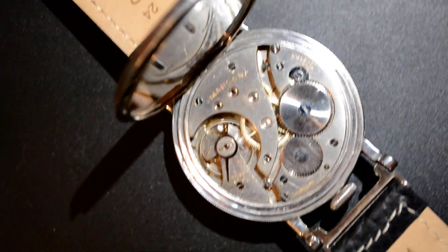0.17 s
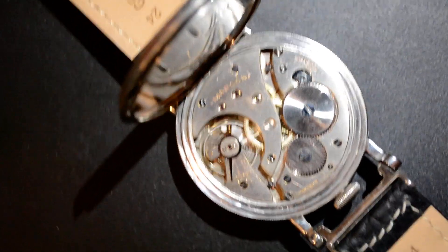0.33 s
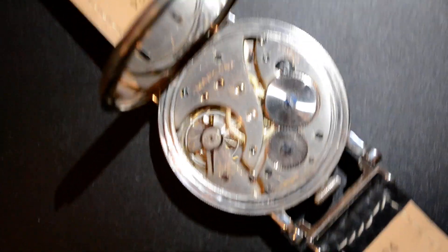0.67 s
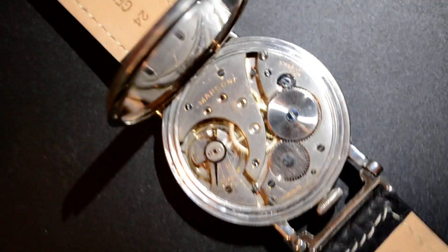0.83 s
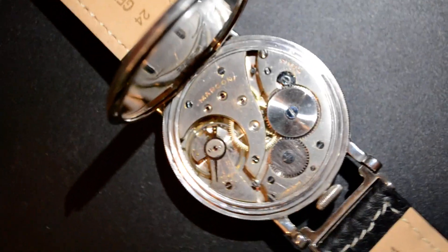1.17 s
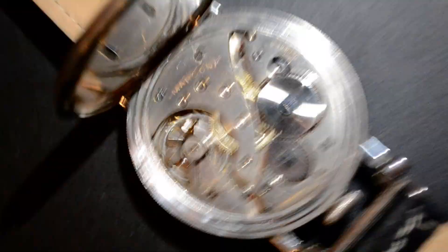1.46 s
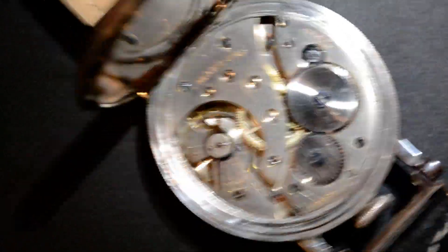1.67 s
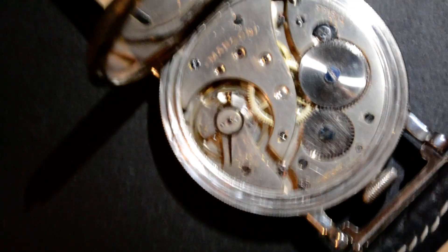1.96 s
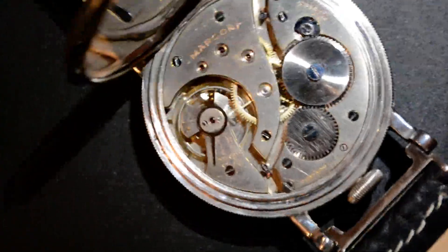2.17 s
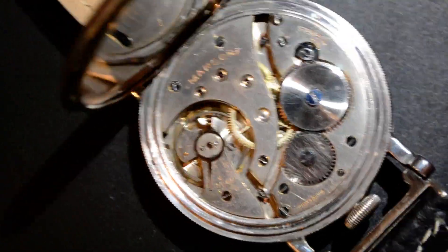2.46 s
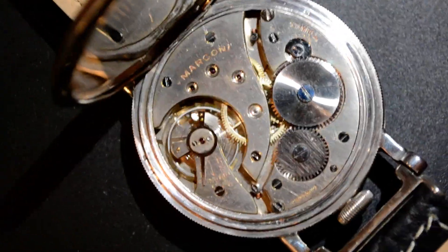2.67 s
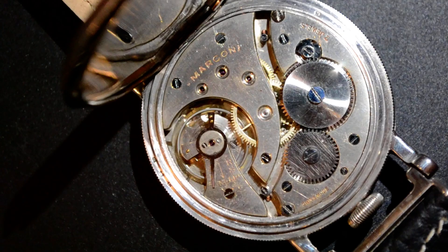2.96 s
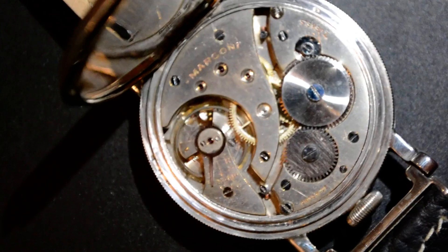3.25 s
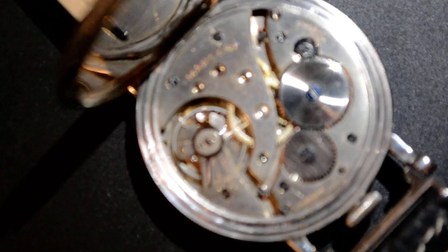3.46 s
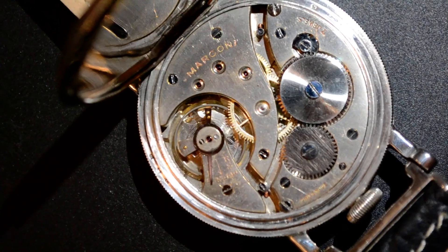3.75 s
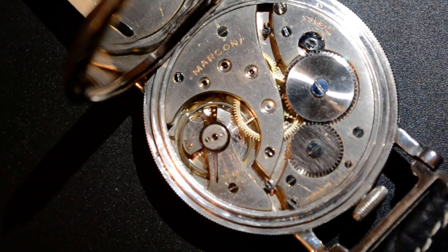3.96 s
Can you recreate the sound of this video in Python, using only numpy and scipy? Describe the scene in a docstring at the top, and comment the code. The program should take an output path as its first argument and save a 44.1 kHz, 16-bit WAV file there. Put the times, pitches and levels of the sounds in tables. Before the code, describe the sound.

Soft rapid watch ticking under camera handling clicks, a scraping lens barrel ending in a loud knock, then brief focus-motor whirs.

```python
"""A quiet room, with a camera held close: an old watch ticks faintly under it, five beats a second.
The hand clicks on the camera body, and the zoom barrel slides and knocks against its stop.
After a light button press the focus motor hunts in four short runs.
Blows are decaying modes plus noise cracks; sliding and rubbing are noise coloured by resonances.
Handling reaches the microphone through the housing, so it is nearly dry, over hiss and hum."""
import sys
import numpy as np
from scipy import signal
from scipy.fft import rfft, irfft
from scipy.io import wavfile
from scipy.ndimage import uniform_filter1d

SR = 44100
rng = np.random.default_rng(int(sys.argv[2]) if len(sys.argv) > 2 else 0)


def to_wav(sig):
    """Store sig (one row per channel, or 1-D mono) as 16-bit WAV at the path in sys.argv[1].

    Samples outside -1..1 are clipped; the rate is SR.
    """
    pcm = np.clip(np.atleast_2d(sig), -1, 1) * 32767
    pcm = np.round(pcm).astype(np.int16)
    wavfile.write(sys.argv[1], SR, pcm.T)  # frames by channels


N = 180829
TIME = np.arange(N) / SR
BLOW = TIME[:SR // 5]   # time axis of one blow, 0.2 s long

# Background hiss: (frequency [Hz], relative level [dB per Hz])
AIR_COLOUR = [(15, -59), (25, -15), (92, -10.5), (122, -10.5), (184, 2), (226, -5), (341, -1.5),
              (441, -4.5), (1260, -6), (2390, -12), (2940, -10.5), (7200, -25.5), (7980, -32.5),
              (9070, -32.5), (11400, -37), (14800, -69), (22000, -120)]
# Wavering hum: (frequency [Hz], level [dB])
HUM_TONES = [(100, -87), (173, -84.5), (199.5, -85), (345, -82.5)]
# Faint singing of the idling lens: (time [s], frequency [Hz], level [dB])
IDLE_SONG = [(0, 2715, -77), (1.304, 2703, -78), (1.599, 2920, -73.5), (2.3, 2987, -75), (2.7, 2973, -82.5),
             (4.1, 2910, -76)]
# Steady higher bands of the idling lens: (frequency [Hz], width [Hz], level [dB])
IDLE_BANDS = [(3140, 114, -83.5), (3624, 150, -85.5), (4360, 150, -84), (5170, 130, -95), (8960, 1600, -92)]

# Steel of the watch movement and case: (frequency [Hz], relative level [dB], t60 [s])
WATCH_MODES = [(2690, -31, .08), (3410, -35, .06), (3940, -11, .05), (4930, -20, 0.072), (6000, -6, 0.017),
               (6360, -1.5, 0.013), (6960, -8.5, 0.07), (7260, -7, 0.019), (7670, -13, 0.047),
               (8390, -27, 0.0063), (8750, -6, 0.018), (9900, -27, 0.038), (9800, -10.5, 0.02),
               (10650, -15, 0.021)]
# The escapement beats evenly, except that every tock comes a little early.
FIRST_BEAT_S, BEAT_S, TOCK_EARLY_S = .0429, .2, .0055
BEAT_DB, MODE_SCATTER_DB = -67, 2.5

# Knocks on the camera body, levels before the register gains:
# (time [s], contact length [s], level [dB], thud weight [dB], brightness [dB per register])
BODY_KNOCKS = [(0.7313, 0.00039, -65.5, -25, 6.5), (0.807, 0.0038, -63, 7.5, -5),
               (0.867, 0.012, -58.5, -7, -5.5), (0.888, 0.0044, -52, -20, -3.5),
               (0.901, 0.0034, -56.5, -4.5, -0.5), (0.9086, 0.0037, -47, -12.5, -2.5),
               (1.2087, 0.00071, -37.5, -24, -1.9), (1.305, 0.0046, -70.5, 11.5, -14),
               (1.333, 0.0042, -49, -4, -4), (1.3403, 0.0014, -43, -1.5, -7.5),
               (1.3452, 0.0031, -56.5, 7, 2.5), (1.504, 0.0024, -45.5, 3, -9),
               (1.5435, 0.0043, -22.5, -3, -1.0), (1.687, 0.0039, -55, -9, -8),
               (1.869, .0007, -63.5, -7, 0), (1.8752, 0.0024, -55, 4, 3), (2.044, 0.0052, -63, 0, -2.5)]
# Camera body: (frequency [Hz], relative level [dB], t60 [s])
BODY_MODES = [(262, -6, .03), (335, -2, .035), (410, -2.5, .031), (462, 0, .035), (750, 0, .035),
              (975, -4, .035), (1140, -7, .035), (1262, -3, .055), (1502, -4, .04), (1724, -7, .035),
              (1873, -1, .035), (2200, -6, .03), (2385, -8, .035), (2552, -8, .035), (2828, 3.5, .028),
              (3112, -8, .035), (3526, -8, .025), (4183, -11, .02), (4425, -8, .025), (4720, -9, .025),
              (4960, -6, .025), (5380, -8, .02), (6051, -19, .015), (6433, -17, .015), (7381, -19, .015),
              (8603, -24, .012), (9631, -18, .015)]
# Colour of the body's crack: (frequency [Hz], relative level [dB per Hz])
BODY_CRACK_COLOUR = [(50, -22), (150, -19), (330, -11), (470, 6.5), (600, -3.5), (780, 6.5), (1250, 10.5),
                     (1900, -2), (2300, -4.5), (2830, -7), (3700, -9.5), (5100, -8.5), (6700, -13),
                     (8200, -23.5), (9600, -13.5), (11400, -29.5)]
# Spans in which the fingers shift on the housing: (start [s], end [s])
FIDGET_SPANS = [(0.70, 1), (1.60, 2.12)]
FIDGET_DB, FIDGET_SPREAD_DB = -71, 4   # before the register gains
# One finger tick: (contact length [s], thud weight [dB], brightness [dB per register])
FINGER_TICK = (0.0023, -5, 1.3)
# A blow eases by this much just after the parts let go.
LET_GO_DB, LET_GO_S = -1.5, 0.0024

# Hiss of the sliding zoom barrel: (frequency [Hz], relative level [dB per Hz])
BARREL_COLOUR = [(71, -70), (120, -19), (172, -22.5), (190, -38), (272, -10), (377, -11.5), (922, -7.5),
                 (1160, -5), (1980, -7), (2790, -7.5), (3570, -11.5), (5130, -12.5), (7950, -17.5),
                 (9260, -17), (11400, -36), (14800, -73), (22000, -120)]
# Resonances of the zoom barrel: (frequency [Hz], width [Hz], relative level [dB])
BARREL_RINGS = [(1313, 260, -10.5), (2160, 130, -9), (2780, 450, -2), (4280, 240, -10.5), (5070, 600, -8)]
# The barrel slides steadily up to its stop, then rubs faintly as it settles.
SLIDE_START_S, SLIDE_STOP_S = 1.344, 1.546
SLIDE_DB, SLIDE_ATTACK_S = -46.5, 0.012
SETTLE_DB, SETTLE_DB_PER_S, SETTLE_UNEVEN_DB = -60.5, 76, 4.5

# Button press: (time [s], level of its ring [dB])
BUTTON_PRESSES = [(2.923, -41.5)]
# Ring of the button: (frequency [Hz], relative level [dB], t60 [s])
BUTTON_MODES = [(1115, 8, 0.0066), (1340, 5, 0.028), (1416, -9.5, 0.14), (2100, 3, 0.016),
                (2230, -2.5, 0.021), (3150, -6, 0.011), (4400, -10, 0.022), (4970, -11, 0.02),
                (7100, -19, 0.0067), (10400, -31, 0.0044)]

# Focus runs; the rubbing level is the base for a surge and a pitch-dependent loss,
# and the click levels come before the register gains:
# (start [s], turn to second speed [s], stop [s], first speed aimed at [Hz], second speed aimed at [Hz],
#  rubbing level [dB], starting click level [dB], braking click level [dB])
MOTOR_RUNS = [(3.056, 3.108, 3.1783, 1650, 299.7, -51, -82, -61.5),
              (3.2153, 3.318, 3.4556, 1902, 1260, -49.5, -59, -57.5),
              (3.5176, 3.599, 3.6874, 1525, 301, -50.5, -60, -58),
              (3.7568, 3.84, 3.8443, 1052, 1050, -52, -63.5, -59)]
# Time constants with which the motor spins up, and with which it nears its second speed
SPIN_UP_S, TURN_S = .035, .018
# Rubbing strands of the motor: (multiple of the speed [-], width [Hz], relative level [dB])
MOTOR_STRANDS = [(1, 70, 0.5), (2, 190, -0.5), (3, 190, 2), (4, 220, -14)]
# Hiss of the motor: (frequency [Hz], relative level [dB per Hz])
MOTOR_HISS = [(200, -21), (800, -6), (1300, -3), (2500, -5), (4400, 3.5), (5500, -9.5), (6300, -24),
              (7500, -16.5), (10100, -21.5), (11400, -43)]
# Resonances of the lens tube: (frequency [Hz], width [Hz], added level [dB])
LENS_TUBE = [(1300, 75, 6.5), (2510, 360, 1), (2910, 120, 5.5), (3780, 260, 3), (4440, 100, 5.5),
             (5030, 150, 4), (5840, 330, -2), (6700, 300, 11), (8450, 1100, 3), (9900, 590, 3)]
CLEAR_HZ = 1190   # above this speed the strands stand out of the rasp
# The rasp sinks from REST_HZ with the square of the speed, by SINK_HZ at CRUISE_HZ.
REST_HZ, SINK_HZ, CRUISE_HZ = 5130, 822, 1227
# Each run surges at first, and is loudest when the rasp suits the lens tube.
SURGE_DB, SURGE_S = 4.5, 0.025
LOUDEST_HZ, OFF_PITCH_DB_PER_OCTAVE = 4170, 13
# Clicks at the ends of a run: (contact length [s], thud weight [dB], brightness [dB per register])
STARTING_CLICK = (0.00041, -26, 7.2)
BRAKING_CLICK = (0.002, -10.5, 6.66)
# The drive takes up its slack during each run, levels before the register gains:
# (time [s], contact length [s], level [dB], thud weight [dB], brightness [dB per register])
SLACK_CLICKS = [(3.0615, .005, -58.5, -26, 9), (3.2295, .003, -52, -14, 5.5), (3.558, .002, -53.5, -3, -3),
                (3.5665, 0.0022, -45.5, -13.5, -1.5), (3.765, 0.0086, -55, -13, 6),
                (3.7702, 0.0042, -51.5, -20, 6.5)]
# Focus drive: (frequency [Hz], relative level [dB], t60 [s])
DRIVE_MODES = [(1016, -8.5, 0.045), (1334, -10, 0.065), (2190, -25, .03), (2650, 7.5, 0.018),
               (2880, -3, 0.036), (3960, 7.5, 0.015), (4500, 5.5, 0.029), (4920, 0, 0.038),
               (6852, -6, 0.018), (8720, -5.5, 0.014)]
# Colour of the drive's crack: (frequency [Hz], relative level [dB per Hz])
DRIVE_CRACK_COLOUR = [(88, -62), (150, -37), (713, -13.5), (1320, -8.5), (2000, -5.5), (2630, -21),
                      (3270, -11.5), (4450, -12.5), (8860, -26), (11400, -37), (14800, -68), (22000, -120)]


def from_db(db):
    """Decibels to gain."""
    return 10 ** (np.asarray(db) / 20)


def rms_one(x):
    """Scale to rms 1."""
    return x / np.sqrt(np.mean(x ** 2) + 1e-20)


def peak_one(x):
    """Scale a blow so that its loudest 5 ms have rms 1."""
    return x / np.sqrt(uniform_filter1d(x ** 2, size=220).max() + 1e-20)


def add(out, s, sound):
    """Mix a sound in at a time in seconds."""
    at = max(round(s * SR), 0)
    out[at:at + len(sound)] += sound[:N - at]


def band(x, low_hz, high_hz):
    """Causal band-pass."""
    edges = [low_hz, min(high_hz, .45 * SR)]
    return signal.sosfilt(signal.butter(2, edges, "band", fs=SR, output="sos"), x)


def noise(spectrum, size=N):
    """Noise of a given colour, rms 1."""
    hz, db = np.transpose(spectrum)
    bins = np.maximum(np.fft.rfftfreq(size, 1 / SR), 1)
    colour = from_db(np.interp(np.log(bins), np.log(hz), db))
    return rms_one(irfft(rfft(rng.standard_normal(size)) * colour, size))


def drift(rate):
    """Slow random wandering, rms 1: white noise through two equal low-pass poles."""
    r = np.exp(-2 * np.pi * rate / SR)
    wander = signal.lfilter([1], [1, -2 * r, r * r], rng.standard_normal(N + SR))
    return rms_one(wander[SR:])   # leave out the filter's first second


def rough_tone(hz, width):
    """A narrow band of noise round a steady or moving pitch, rms about 1."""
    phase = 2 * np.pi * np.cumsum(hz * np.ones(N)) / SR
    return drift(width * .5) * np.cos(phase) + drift(width * .5) * np.sin(phase)


def rough_tones(rows):
    """Sum of noise bands from (frequency [Hz], width [Hz], level [dB])."""
    return sum(from_db(db) * rough_tone(hz, width) for hz, width, db in rows)


def dying(t60, hold_s=0):
    """A blow holds while the parts touch, then dies away."""
    return from_db(-60 * np.maximum(BLOW - hold_s, 0) / t60)


def ring(modes, vary_db, hold_s=0):
    """One blow: every mode rings with a random strength and phase of its own."""
    out = np.zeros(len(BLOW))
    for hz, db, t60 in modes:
        strength = from_db(db + rng.normal(0, vary_db))
        out += strength * dying(t60, hold_s) * np.sin(2 * np.pi * (hz * BLOW + rng.random()))
    return out


def resonate(x, rings):
    """Add the resonances of a housing to a sound."""
    out = x.copy()
    for hz, width, db in rings:
        out += from_db(db) * signal.lfilter(*signal.iirpeak(hz, hz / width, fs=SR), x)
    return out


def background():
    """Hiss, a wavering hum and the faint singing of the idling lens, as steady or gliding noise bands."""
    hiss = from_db(-66.5) * noise(AIR_COLOUR)
    hum = sum(from_db(db) * rough_tone(hz, 4.7) for hz, db in HUM_TONES)
    s, hz, db = np.transpose(IDLE_SONG)
    song = from_db(np.interp(TIME, s, db)) * rough_tone(np.interp(TIME, s, hz), 90)
    return hiss + hum + song + rough_tones(IDLE_BANDS)


def room(x, t60):
    """A short diffuse tail from the table and walls: decaying noise, cut at 0.2 s."""
    tail = band(rng.standard_normal(len(BLOW)), 280, 4856)
    tail = tail * dying(t60) * (1 - np.exp(-BLOW / 0.003))
    return signal.fftconvolve(x, tail / np.sqrt(np.sum(tail ** 2)))[:N]


def watch(uneven_db, drop_s, drop_db):
    """Each beat: the pallet strikes, and a moment later the escape wheel drops onto its lock."""
    out = np.zeros(N)
    for k, due in enumerate(np.arange(FIRST_BEAT_S, N / SR - drop_s, BEAT_S)):
        s = due - TOCK_EARLY_S * (k % 2)
        db = BEAT_DB + rng.normal(0, uneven_db)
        strike = peak_one(ring(WATCH_MODES, MODE_SCATTER_DB))
        drop = peak_one(ring(WATCH_MODES, MODE_SCATTER_DB))
        add(out, s, from_db(db) * strike)
        add(out, s + drop_s, from_db(db + drop_db) * drop)
    return out


def fidgets(count):
    """Rows of faint touches at random moments in each span while the grip shifts."""
    length, weight_db, bright_db = FINGER_TICK
    rows = []
    for start, end in FIDGET_SPANS:
        for _ in range(count):
            db = FIDGET_DB + rng.normal(0, FIDGET_SPREAD_DB)
            rows.append((rng.uniform(start, end), length, db, weight_db, bright_db))
    return rows


def blows(table, modes, crack, crack_db, register_db, register_t60, rise_share):
    """Plastic parts meet: modes plus a dense crack, in four registers: thud, clack, ping and snap.
    A longer contact is a softer one; the snap rises and lets go first, the lows outlast it."""
    out = np.zeros(N)
    edges = [(110, 540), (620, 2200), (2400, 3400), (3600, 11500)]   # Hz
    contact_shares = [0.81, 0.56, 1.0, 0.17]
    registers = list(zip(edges, register_db, register_t60, contact_shares))
    for s, length, db, weight_db, bright_db in table:
        levels = [db + weight_db, db, db + bright_db, db + 2 * bright_db]
        grit = noise(crack, size=len(BLOW))
        for level, ((low, high), gain_db, t60, share) in zip(levels, registers):
            hold_s = length * share
            attack = 1 - np.exp(-BLOW / max(rise_share * hold_s, 1 / SR))
            let_go = from_db(LET_GO_DB * np.clip((BLOW - hold_s) / LET_GO_S, 0, 1))
            contact = attack * let_go
            near_modes = [mode for mode in modes if low / 2 < mode[0] < high * 2]
            tone = band(ring(near_modes, 0.89, hold_s) * contact, low, high)
            burst = band(grit * contact * dying(t60, hold_s), low, high)
            mixed = peak_one(tone) + from_db(crack_db) * peak_one(burst)
            add(out, s, from_db(level + gain_db) * peak_one(mixed))
    return out


def body_knocks():
    """The hand and the barrel's stop strike the camera body, which rings briefly and cracks."""
    return blows(BODY_KNOCKS + fidgets(count=5), BODY_MODES, BODY_CRACK_COLOUR, crack_db=4.0,
                 register_db=[1.5, 2.5, 2.35, 1.0],
                 register_t60=[0.022, 0.011, 0.011, 0.016], rise_share=0.21)


def zoom_barrel(grain_db):
    """Sliding friction hisses through the resonances of the barrel."""
    rub = rms_one(noise(BARREL_COLOUR) + rough_tones(BARREL_RINGS))
    since_start = np.maximum(TIME - SLIDE_START_S, 0)
    since_stop = np.maximum(TIME - SLIDE_STOP_S, 0)
    sliding = from_db(SLIDE_DB) * (1 - np.exp(-since_start / SLIDE_ATTACK_S))
    settling = from_db(SETTLE_DB - SETTLE_DB_PER_S * since_stop + SETTLE_UNEVEN_DB * drift(45))
    return rub * np.where(TIME < SLIDE_STOP_S, sliding, settling) * from_db(grain_db * drift(164))


def button(crack_db, crack_t60):
    """A light press: a short noise crack and a ring with one lingering mode."""
    out = np.zeros(N)
    for s, db in BUTTON_PRESSES:
        crack = peak_one(band(rng.standard_normal(len(BLOW)) * dying(crack_t60), 1200, 3400))
        tone = peak_one(ring(BUTTON_MODES, vary_db=1.0) * (1 - np.exp(-BLOW / 0.00029)))
        add(out, s, from_db(db) * (tone + from_db(crack_db) * crack))
    return out


def focus_motion():
    """Speed, rasp pitch and gain: each run spins up; the first three then ease to a slower speed,
    the last stops while still speeding up."""
    speed, drive = np.zeros(N), np.zeros(N)
    for start, turn, stop, first_hz, second_hz, db, *_ in MOTOR_RUNS:
        running = (TIME > start) & (TIME < stop)
        t = TIME[running]
        rising = first_hz * (1 - np.exp((start - np.minimum(t, turn)) / SPIN_UP_S))
        remaining = np.exp(-np.maximum(t - turn, 0) / TURN_S)
        speed[running] = second_hz + (rising - second_hz) * remaining
        drive[running] = from_db(db + SURGE_DB * np.exp((start - t) / SURGE_S))
    pitch = REST_HZ - SINK_HZ * (speed / CRUISE_HZ) ** 2
    off_pitch = np.abs(np.log2(pitch / LOUDEST_HZ))   # octaves
    gain = drive * from_db(-OFF_PITCH_DB_PER_OCTAVE * off_pitch)
    return speed, pitch, uniform_filter1d(gain, size=130)


def focus_motor(hiss_db, smear_db_per_octave, grain_db):
    """A friction motor: strands follow its speed through the lens tube, and smear into a rasp when slow."""
    speed, pitch, gain = focus_motion()
    strands = sum(from_db(db) * rough_tone(k * speed, width) for k, width, db in MOTOR_STRANDS)
    strands = band(rms_one(strands), 2520, 4200)
    smear = from_db(smear_db_per_octave * np.log2(CLEAR_HZ / (speed + 1)))
    whine = (strands + smear * rough_tone(pitch, 980)) / np.sqrt(1 + smear ** 2)
    rub = resonate(whine + from_db(hiss_db) * noise(MOTOR_HISS), LENS_TUBE)
    rub = rub / np.sqrt(uniform_filter1d(rub ** 2, size=500))   # even out, so that the gain sets loudness
    return rub * gain * from_db(grain_db * drift(200))


def drive_contacts():
    """Rows of clicks as each run starts, as the drive takes up its slack and as it brakes."""
    rows = list(SLACK_CLICKS)
    for start, _, stop, *_, start_db, brake_db in MOTOR_RUNS:
        for s, db, click in [(start, start_db, STARTING_CLICK), (stop, brake_db, BRAKING_CLICK)]:
            length, weight_db, bright_db = click
            rows.append((s, length, db, weight_db, bright_db))
    return rows


def drive_clicks():
    """Parts of the focus drive meet, ringing its modes with a dense crack."""
    return blows(drive_contacts(), DRIVE_MODES, DRIVE_CRACK_COLOUR, crack_db=-0.5,
                 register_db=[9.0, 5.0, -1.0, 0.0],
                 register_t60=[0.052, 0.028, 0.028, 0.0086], rise_share=0.16)


def scene():
    """Watch, camera and room at one microphone."""
    near = watch(uneven_db=0.7, drop_s=.005, drop_db=-13.0)
    near += body_knocks()
    near += zoom_barrel(grain_db=.5)
    near += button(crack_db=-12.0, crack_t60=0.024)
    near += focus_motor(hiss_db=-4.0, smear_db_per_octave=21, grain_db=0.3)
    near += drive_clicks()
    return (near + from_db(-28.0) * room(near, t60=0.39) + background())[None]


def record(dry):
    """The microphone rolls off in the deep bass and top treble, then the band ends steeply."""
    thin = signal.sosfilt(signal.butter(1, 50, "high", fs=SR, output="sos"), dry)
    soft = signal.sosfilt(signal.butter(8, 10600, fs=SR, output="sos"), thin)
    return signal.sosfilt(signal.ellip(10, .1, 80, 11600, fs=SR, output="sos"), soft)


dry = scene()
out = record(dry)
to_wav(out)
```